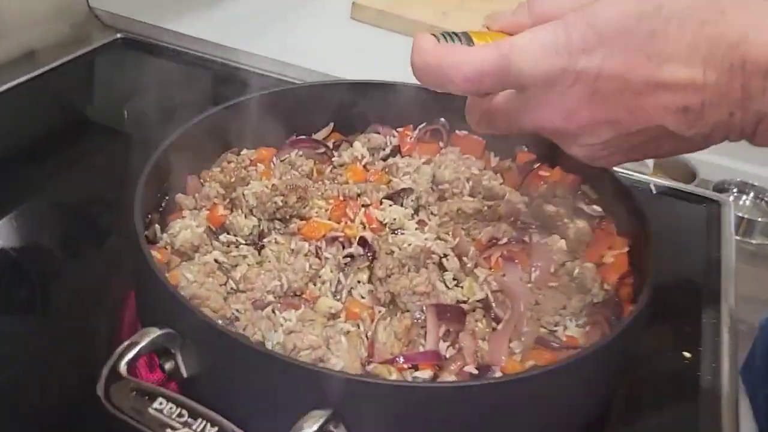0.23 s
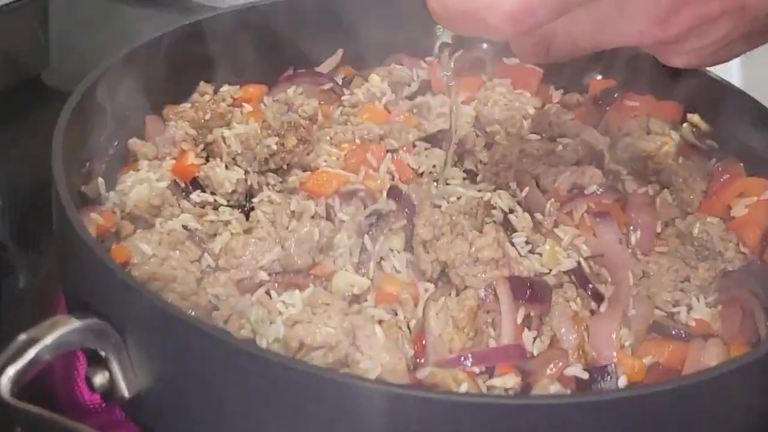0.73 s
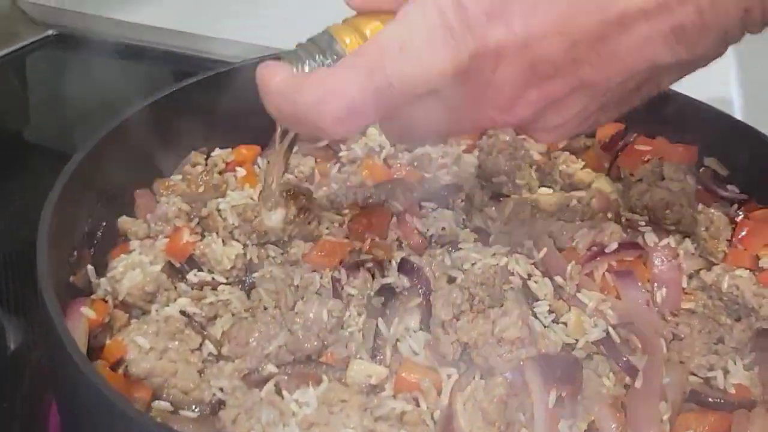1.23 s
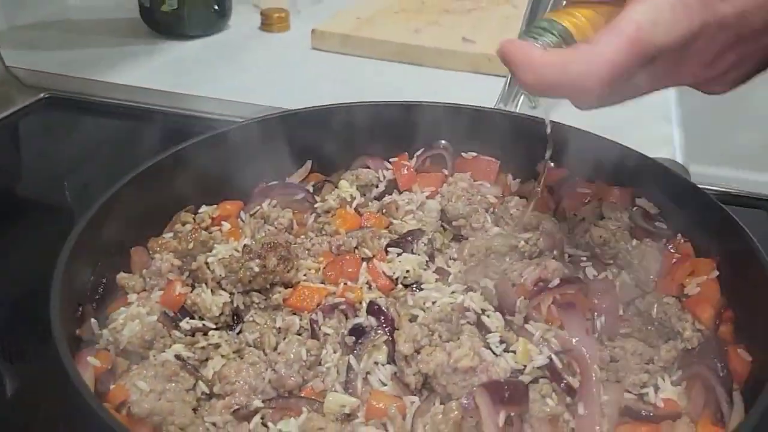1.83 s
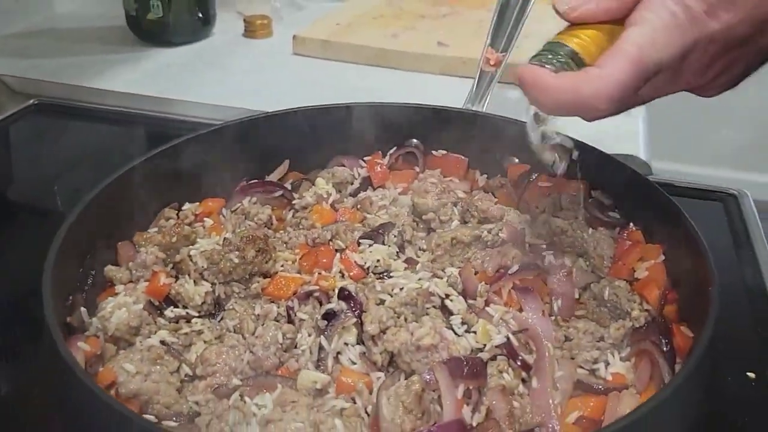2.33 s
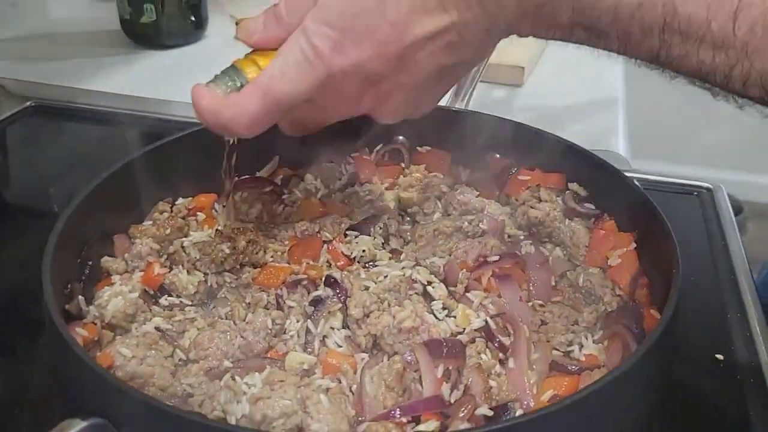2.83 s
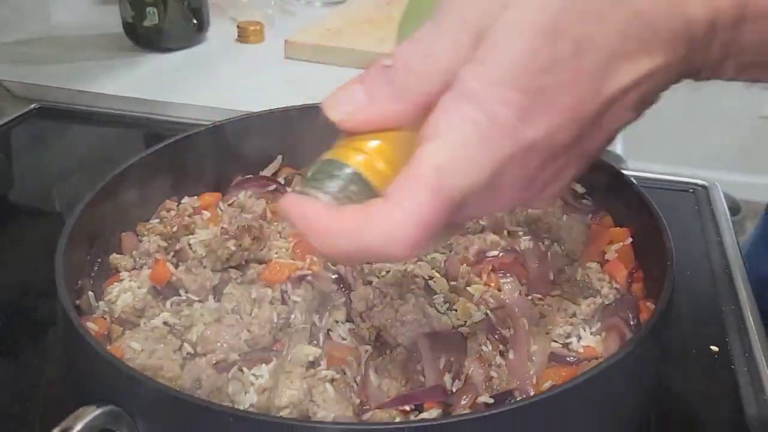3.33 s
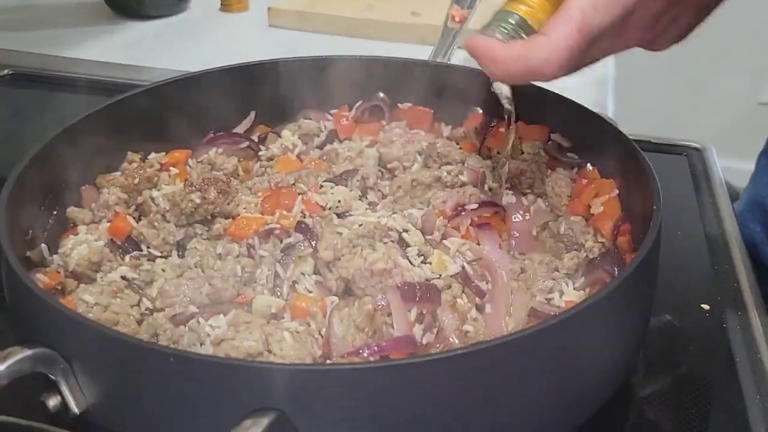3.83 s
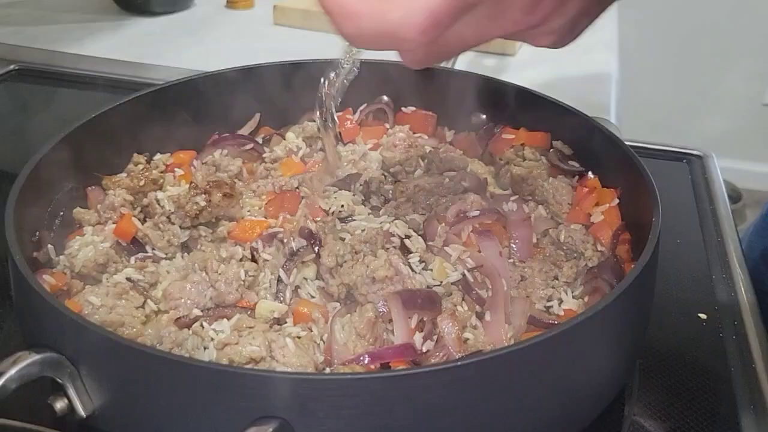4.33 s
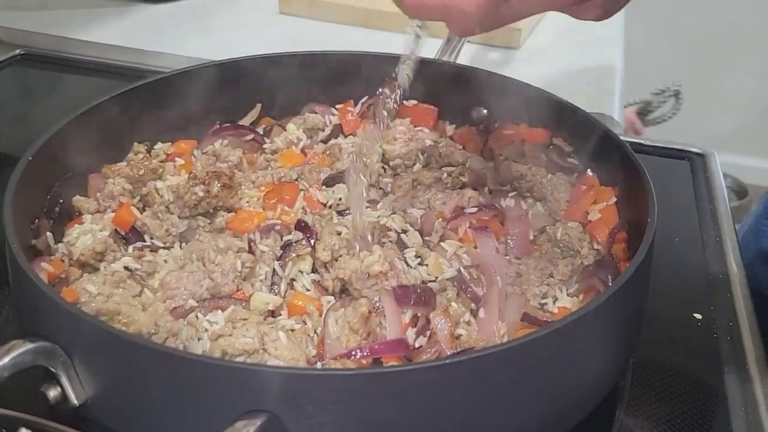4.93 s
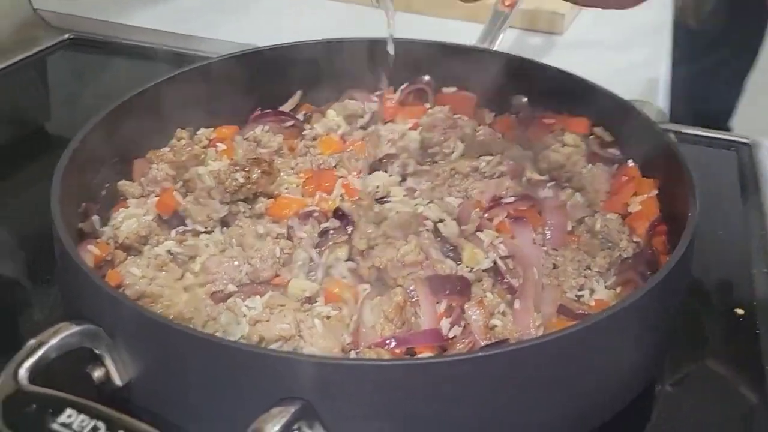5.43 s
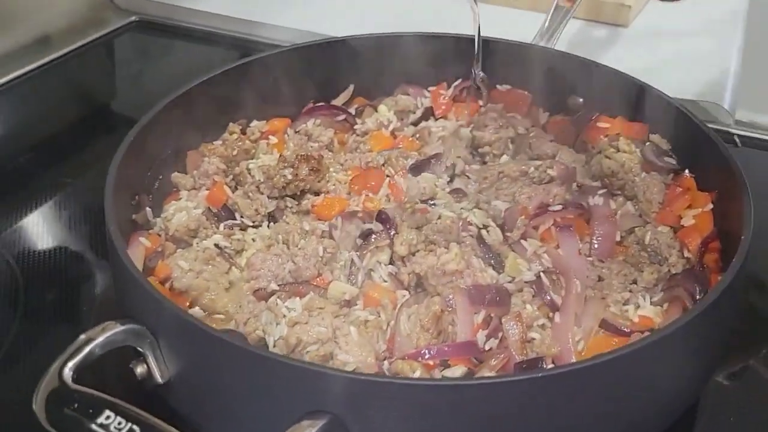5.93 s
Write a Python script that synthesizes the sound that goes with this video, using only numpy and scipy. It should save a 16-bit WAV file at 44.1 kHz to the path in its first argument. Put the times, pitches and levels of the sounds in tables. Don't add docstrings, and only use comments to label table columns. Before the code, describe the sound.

Close to a hot, deep pan in a home kitchen, a crisp sizzle runs continuously with tiny crackles and sharp fat spits. Wine pours from a bottle with low gulps, and the hiss swells strongly over the first two seconds. As liquid pools, the brightness dulls and big bubbles plop and boil underneath. A fan drones faintly; soft handling bumps come from the hand-held stereo camera.

```python
import sys
import numpy as np
from scipy import signal
from scipy.fft import rfft, irfft, next_fast_len
from scipy.io import wavfile
from scipy.ndimage import uniform_filter1d, map_coordinates

SR = 44100
rng = np.random.default_rng(int(sys.argv[2]) if len(sys.argv) > 2 else 0)


def magnitude_from_level(level_db):
    exponent = np.asarray(level_db, float) / 20
    return 10 ** exponent


def to_wav(sig):
    pcm = np.clip(np.atleast_2d(sig), -1, 1) * 32767
    pcm = np.round(pcm).astype(np.int16)
    wavfile.write(sys.argv[1], SR, pcm.T)


N = 272185
TOP_HZ = 15850


def unit(x):
    return x / np.sqrt(np.mean(x ** 2) + 1e-20)


def along(points, hz):
    point_hz, value = np.transpose(points)
    return np.interp(np.log(hz + 1), np.log(point_hz + 1), value)


def wobble(rate):
    knots = rng.standard_normal(int(N * rate / SR) + 4)
    return map_coordinates(knots, [np.arange(N) * rate / SR])


def filtered(x, response):
    m = next_fast_len(N + 8192)
    return irfft(rfft(x, m) * response(np.fft.rfftfreq(m, 1 / SR)), m)[..., :N]


def coloured(x, spectrum):
    return unit(filtered(x, lambda hz: magnitude_from_level(along(spectrum, hz))))


def steam():
    return rng.standard_normal((2, N))


def odds(luck, spread_db):
    return magnitude_from_level(spread_db * np.minimum(-np.log(1 - luck), 5))


def rings(s, hz, cycles, size, rise, count):
    t = np.arange(count) / SR
    turns = hz[:, None] * t
    shape = size[:, None] * np.exp(-turns / cycles) * (1 - np.exp(-2 * turns))
    at = ((s * SR).astype(int)[:, None] + np.arange(count)).ravel()
    swing = 2 * np.pi * turns * (1 + rise * turns / cycles)
    phase = 2 * np.pi * rng.random((len(s), 2))
    streams = []
    for start in phase.T:
        ringing = shape * np.sin(swing + start[:, None])
        streams.append(np.bincount(at, ringing.ravel(), N + count)[:N])
    return np.array(streams)


def bubbles(lo_hz, hi_hz, cycles, spread_db, rise, count, size):
    when, pitch, luck = rng.random((count, 3)).T
    hz = lo_hz * (hi_hz / lo_hz) ** pitch
    return unit(rings(when * N / SR, hz, cycles, hz * odds(luck, spread_db), rise, count=size))


def bursts(life_s, spread_db, count):
    when, luck = rng.random((count, 2)).T
    power = np.bincount((when * N).astype(int), odds(luck, spread_db) ** 2, N)
    return np.abs(signal.lfilter([1], [1, -np.exp(-1 / (life_s * SR))], power))


def ticks(spread_db, count):
    when, luck = rng.random((count, 2)).T
    size = odds(luck, spread_db) * rng.standard_normal((count, 2)).T
    return unit(np.array([np.bincount((when * N).astype(int), s, N) for s in size]))


def patchy(x, patchy_db):
    z = signal.stft(x, nperseg=256)[2]
    field = uniform_filter1d(rng.standard_normal(z.shape[1:]), size=12, axis=0)
    field = uniform_filter1d(field, size=10, axis=1)
    return signal.istft(z * magnitude_from_level(patchy_db * unit(field)), nperseg=256)[1][:, :N]


FLASH_S, FLASH_RISE_S = 1.67, 0.071

# frequency in Hz, level in dB per Hz.
ROOM_SPECTRUM = [(20, -20), (40, -9), (60, -1), (80, -0.5), (110, 4), (160, -17), (250, -3), (500, -21.5)]


def room():
    t = np.arange(N) / SR
    swell_db = 2.8 * np.clip((t - FLASH_S) / .1, 0, 1)
    return magnitude_from_level(-59 + swell_db) * coloured(rng.standard_normal((2, N)), ROOM_SPECTRUM)


def fan_and_hum():
    t = np.arange(N) / SR
    fan = magnitude_from_level(-62 + .8 * wobble(2.9)) * np.sin(2 * np.pi * 47 * t + 0.79 * wobble(3.33))
    switch = np.clip((1.6 - t) / .02, 0, 1)
    hum = magnitude_from_level(-58.5) * np.sin(2 * np.pi * 120 * t) * switch
    return np.array([fan + hum, 0 * t])


# centre in seconds, level in dB, length in seconds, top frequency in Hz.
HAND_BUMPS = [(0.324, -55, .04, 90), (0.468, -49, 0.031, 130), (0.57, -52, 0.044, 90),
              (0.901, -54, .06, 60), (1.716, -51, 0.049, 130), (2.122, -55, .03, 170),
              (2.832, -52, 0.029, 190), (5.38, -46, .03, 200), (4.36, -50, 0.065, 130),
              (5.581, -53, 0.073, 120), (5.89, -43.5, 0.08, 61), (6.032, -57, 0.037, 220)]


def bumps():
    t, out = np.arange(N) / SR, np.zeros((2, N))
    for s, db, length, top_hz in HAND_BUMPS:
        near = slice(round((s - .2) * SR), round((s + 0.12) * SR))
        band = signal.butter(2, [15, top_hz], "bandpass", fs=SR, output="sos")
        shake = unit(signal.sosfilt(band, rng.standard_normal(SR)))
        swell = magnitude_from_level(db) * np.exp(-((t[near] - s) / length) ** 2)
        out[0, near] += swell * shake[-len(swell):]
    return out


# start in seconds, peak in dB, pitch in Hz.
BOTTLE_GULPS = [(0.459, -57, 132), (0.561, -50, 205), (0.907, -43, 292), (1.257, -40, 298),
                (1.586, -38, 293), (2.109, -51, 133), (2.82, -47.5, 169), (3.277, -36, 328),
                (3.347, -36, 330), (4.339, -38, 323), (5.054, -38, 288), (5.36, -47, 194),
                (5.869, -39, 320), (5.919, -38, 318), (6.026, -42, 237)]


def gulps():
    s, db, hz = np.transpose(BOTTLE_GULPS)
    return rings(s, hz, 5.3, magnitude_from_level(db + 2.5), 0.0082, count=4000) * [[1], [0]]


# start in seconds, peak in dB, pitch in Hz.
POOL_BUBBLES = [(0.46, -19.5, 600), (0.901, -16, 597), (0.978, -19, 636), (1.258, -19, 587),
                (1.544, -20, 584), (1.583, -17.5, 533), (1.674, -26, 558), (2.4, -23, 570),
                (2.55, -19, 1000), (2.694, -25, 807), (3.123, -12.5, 880), (3.509, -24, 740),
                (3.56, -17, 670), (3.762, -13, 850), (3.868, -12, 1030), (3.917, -12, 1000),
                (3.965, -9, 830), (4.319, -15, 544), (4.347, -8, 840), (4.438, -22, 536), (4.552, -7, 745),
                (4.905, -15.5, 710), (5.061, -4, 702), (5.261, -15, 552), (5.351, -11.5, 1070),
                (5.433, -8, 864), (5.538, -11, 590), (5.696, -7.5, 800), (6.019, -10, 830)]


def blobs():
    s, db, hz = np.transpose(POOL_BUBBLES)
    return rings(s, hz, 1.9, magnitude_from_level(db - 7.0), 0, count=1200) * [[1], [.4]]


# centre in seconds, level in dB, length in seconds, band centre in Hz.
STEAM_FLARES = [(0.066, -31, 0.0066, 13000), (0.236, -34, 0.0064, 2300), (0.4075, -25, 0.002, 2300),
                (0.4, -24, 0.0015, 2400), (0.582, -36, 0.017, 8500), (0.98, -26, 0.011, 3320),
                (1.195, -34, .03, 8650), (1.23, -38, .005, 13500), (1.59, -29, .015, 14000),
                (1.588, -28, .01, 2270), (1.755, -30, 0.024, 2300), (1.92, -30, 0.021, 2500),
                (2.962, -31, .012, 7500), (3.901, -34, 0.083, 1040), (4.402, -31, 0.013, 6640)]


def flares():
    out, t = np.zeros((2, N)), np.arange(-SR // 20, SR // 10) / SR
    for s, db, length, hz in STEAM_FLARES:
        edges = [hz / 1.155, min(hz * 1.116, TOP_HZ)]
        band = signal.butter(2, edges, "bandpass", fs=SR, output="sos")
        puff = unit(signal.sosfilt(band, rng.standard_normal((2, len(t)))))
        swell = magnitude_from_level(db) * np.exp(-(t / length) ** 2)
        out[:, round(s * SR) - SR // 20:][:, :len(t)] += swell * puff
    return out


# start in seconds, peak in dB, level of the low part against the peak in dB.
FAT_SPITS = [(0.062, -23, -9), (0.149, -18, -12), (0.2386, -15, -20), (0.4, -20, -6), (0.407, -15, -11),
             (0.424, -16, -19), (0.546, -20, -16), (0.5977, -15, -21), (0.659, -20, -5), (0.9797, -18, -5),
             (1.275, -13.5, -7), (1.3583, -8.5, -9.5), (1.4065, -17.5, -0.5), (1.5379, -16.5, -6),
             (1.583, -19, 1), (1.7105, -15, -20), (1.7624, -20, -10), (1.8907, -9.5, -18),
             (2.0228, -10, -5), (2.3804, -11, -23), (2.496, -19, -12), (2.6315, -18, -3), (2.646, -16, -10),
             (3.2791, -23, 5.5), (3.3554, -16, -0.5), (4.15, -18, -14), (4.5244, -15.5, -5),
             (4.8258, -12.5, -9), (4.9955, -20, -9), (5.91, -18, -13)]
# frequency in Hz, level in dB per Hz.
FIZZ_SPECTRUM = [(2500, -18), (3600, -0.5), (4800, -2.5), (6200, 0.5), (8800, 1), (10000, -1.5),
                 (11000, -5), (12300, -1), (14500, -0.5), (15800, -3.5)]
# frequency in Hz, level in dB per Hz.
SIMMER_SPECTRUM = [(800, -38), (1100, -7), (1420, -4.5), (1580, -1.5), (1760, 1.5), (1950, 0.5),
                   (2300, -0.5), (2950, -1.5), (3600, -9.5), (4300, -22.5), (5500, -46)]


def spits():
    high, low, t = np.zeros((2, N + 400)), np.zeros((2, N + 400)), np.arange(400) / SR

    def puff(life_s):
        return t / life_s * np.exp(-t / life_s) * rng.standard_normal((2, len(t)))

    for s, db, low_db in FAT_SPITS:
        i = round(s * SR)
        high[:, i:i + len(t)] += magnitude_from_level(db) * puff(0.00056)
        low[:, i:i + len(t)] += magnitude_from_level(db + low_db) * puff(0.00077)
    bright = filtered(high[:, :N], lambda hz: magnitude_from_level(along(FIZZ_SPECTRUM, hz) + 6))
    dull = filtered(low[:, :N], lambda hz: magnitude_from_level(along(SIMMER_SPECTRUM, hz) + 20.5))
    return bright + dull


# time in seconds, level in dB.
SEETHING = [(0, -32), (.11, -34.5), (.34, -31.5), (.56, -32), (.79, -30.5), (1.23, -28.5), (1.57, -28),
            (1.79, -26), (2.02, -24.5), (2.36, -24), (2.69, -24.5), (3.03, -23.5), (3.25, -25),
            (4.04, -25.5), (4.55, -26), (4.94, -28), (5.42, -27.5), (6.17, -29)]
# time in seconds, share of the final pool 0-1.
POOLED = [
    (0, 0),
    (1.55, 0.2),
    (2.3, 0.26),
    (2.95, 0.51),
    (4.1, 0.66),
    (4.95, 0.89),
    (5.45, 0.89),
    (6.17, 0.91),
]
FIZZ_DRY_DB, DROWN_DB, DROWN_SHARE = -0.26, -2, 0.3
BOIL_DRY_DB, BOIL_GAIN_DB = -14.5, 10.5
DEEP_DRY_DB, THIN_DB, DEEPEN_DB = -1.5, -5, 4
BRIGHT_DRY_DB, DULL_DB = 0.5, -3.5


def controls():
    t = np.arange(N) / SR
    seethe_db = np.interp(t, *np.transpose(SEETHING))
    pool = np.clip(np.interp(t, *np.transpose(POOLED)), 0, None)
    flash = .5 + .5 * np.tanh((t - FLASH_S) / FLASH_RISE_S)
    fizz_db = seethe_db + FIZZ_DRY_DB + DROWN_DB * (1 - np.exp(-pool / DROWN_SHARE))
    boil_db = seethe_db + BOIL_DRY_DB + BOIL_GAIN_DB * pool
    deep_db = DEEP_DRY_DB + flash * (THIN_DB + DEEPEN_DB * pool)
    spray_db = BRIGHT_DRY_DB + DULL_DB * pool
    return fizz_db, seethe_db, boil_db, deep_db, spray_db


# frequency in Hz, level in dB per Hz.
BOIL_SPECTRUM = [(120, -27), (190, -21), (270, -10.5), (320, -4.5), (370, -9), (455, -10.5), (510, 1),
                 (580, 2.6), (660, 0.5), (780, 3), (920, -3.5), (1050, 0.5), (1300, -2), (1500, -25.5)]


def boil(pops, deep_db):
    cloud = bubbles(156.4, 1775, cycles=7.0, spread_db=0.76, rise=0.008, count=2600, size=1300)
    large = 1.4 * steam() + 0.37 * pops + 0.26 * cloud
    sound = coloured(magnitude_from_level(0.31 * wobble(17)) * large, BOIL_SPECTRUM)
    deep = filtered(sound, lambda hz: 1 / (1 + (hz / 850) ** 8))
    return sound + (magnitude_from_level(deep_db) - 1) * deep


def simmer(gate, pops, flutter, ridge_db):
    cloud = bubbles(710, 5440, cycles=9.1, spread_db=1.5, rise=0.03, count=5000, size=360)
    small = 1.05 * gate * steam() + .5 * pops + 0.27 * cloud
    sway = magnitude_from_level(0.26 * flutter + 0.21 * wobble(25))
    sound = coloured(sway * patchy(small, patchy_db=0.5), SIMMER_SPECTRUM)
    ridge = filtered(sound, lambda hz: np.exp(-((hz - 1780) / 260) ** 2))
    return sound + (magnitude_from_level(ridge_db) - 1) * ridge


def fizz(gate, pops, flutter, spray_db):
    cloud = bubbles(2510, 15700, cycles=4.5, spread_db=3.5, rise=0.028, count=9000, size=64)
    tiny = 1.1 * gate * steam() + 0.61 * pops + 0.4 * cloud
    sway = magnitude_from_level(0.29 * flutter + 0.63 * wobble(60))
    sound = coloured(sway * patchy(tiny, patchy_db=0.41), FIZZ_SPECTRUM)
    spray = filtered(sound, lambda hz: 1 / (1 + (10600 / (hz + 1)) ** 8))
    return sound + (magnitude_from_level(spray_db) - 1) * spray


def pan():
    fizz_db, simmer_db, boil_db, deep_db, spray_db = controls()
    crackle = bursts(life_s=0.0023, spread_db=3.0, count=7000)
    gate = np.sqrt(2.24 + 0.84 * magnitude_from_level(2.7 * spray_db) * crackle / crackle.mean())
    pops = ticks(spread_db=3.0, count=6000)
    flutter = unit(wobble(9) + wobble(21.94))
    ridge_db = 0.56 * uniform_filter1d(boil_db - simmer_db + 8.0, size=SR // 2)
    out = magnitude_from_level(fizz_db - 0.1) * fizz(gate, pops, flutter, spray_db)
    out = out + magnitude_from_level(simmer_db - 0.4) * simmer(gate, pops, flutter, ridge_db)
    return out + magnitude_from_level(boil_db + 3.0) * boil(pops, deep_db)


# frequency in Hz, likeness 0-1.
PORT_LIKENESS = [(50, .85), (130, .88), (290, .93), (420, .45), (550, .9), (680, .66), (800, .14),
                 (1000, .42), (1400, .68), (1600, .25), (2100, .53), (2600, .1), (3000, .28), (6000, .12)]
# frequency in Hz, lead in radians.
PORT_LEAD = [(100, .4), (350, .3), (480, .8), (600, .5), (720, .5), (1000, 1.1), (1200, 2.2), (2400, 2.1),
             (3000, 2.6), (3800, 1.6), (4400, .6), (5000, -2.8), (7000, -2.6)]
# frequency in Hz, left minus right in dB.
PORT_LEAN = [(60, 0), (170, -1.5), (350, -1.5), (430, -5.5), (540, 2), (750, 1), (900, -10.5), (1150, -3.5),
             (1300, -2), (1700, -3.5), (2800, -3.5), (3600, -1.5), (4900, 4), (7500, -4), (11000, -2.5),
             (13000, -1.5)]


def ports(pair):
    def mix(hz):
        turn = np.arccos(np.clip(along(PORT_LIKENESS, hz), 0, 1)) / 2
        return [np.cos(turn), np.sin(turn)]

    def tilt(hz):
        half = magnitude_from_level(along(PORT_LEAN, hz) / 2) * np.exp(.5j * along(PORT_LEAD, hz))
        return [half, 1 / half]

    shared, apart = filtered(pair, mix)
    return filtered(np.array([shared + apart, shared - apart]), tilt)


def scene():
    kitchen = room() + fan_and_hum() + bumps()
    return ports(kitchen + gulps() + blobs() + flares() + spits() + pan())


def low_pass(x):
    return signal.sosfilt(signal.butter(12, 15850, fs=SR, output="sos"), x)


def record(dry):
    mix = filtered(dry, lambda hz: hz < TOP_HZ)
    return low_pass(mix)


dry = scene()
out = record(dry)
to_wav(out)
```